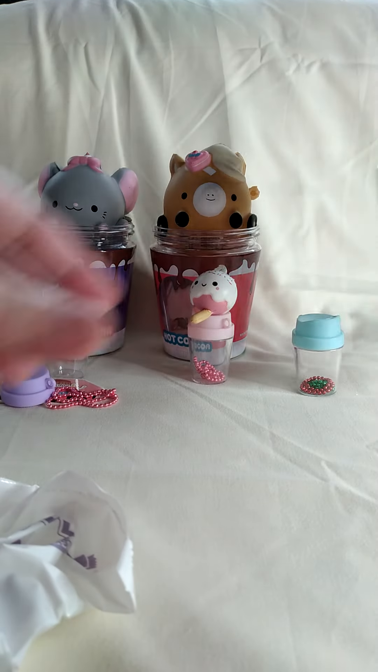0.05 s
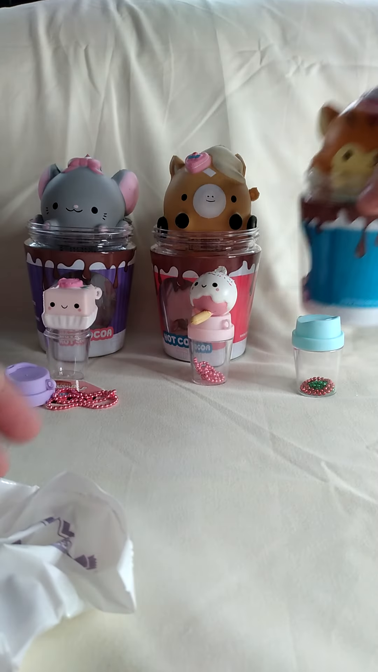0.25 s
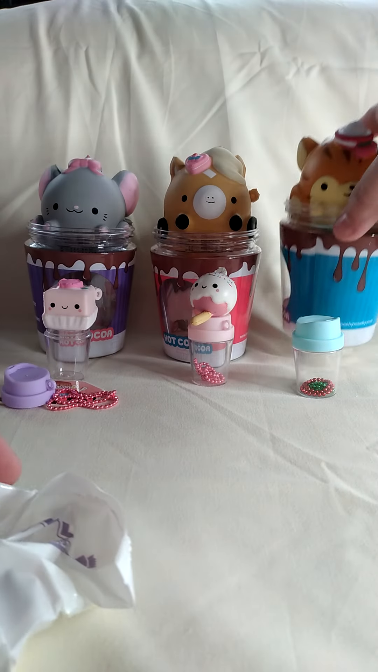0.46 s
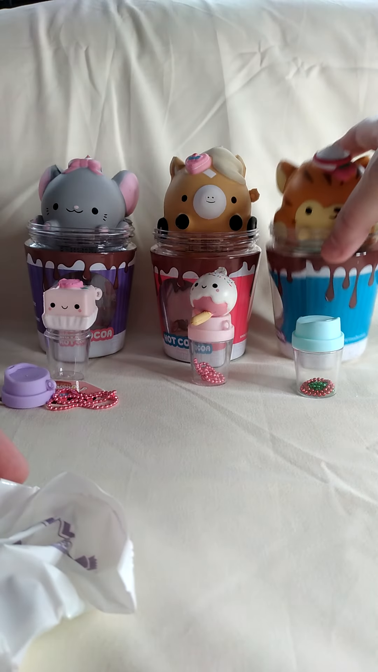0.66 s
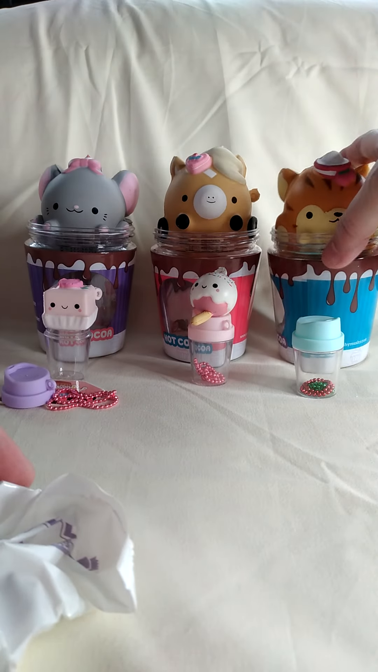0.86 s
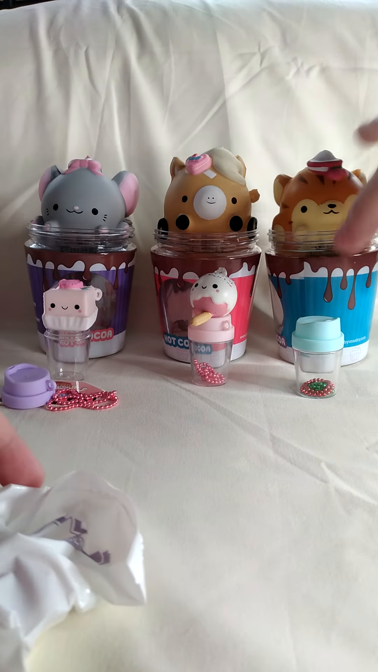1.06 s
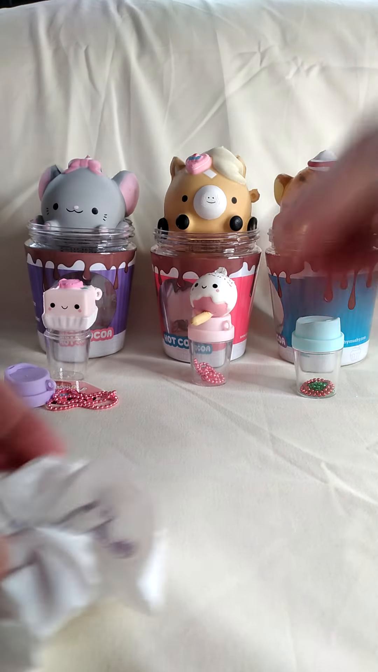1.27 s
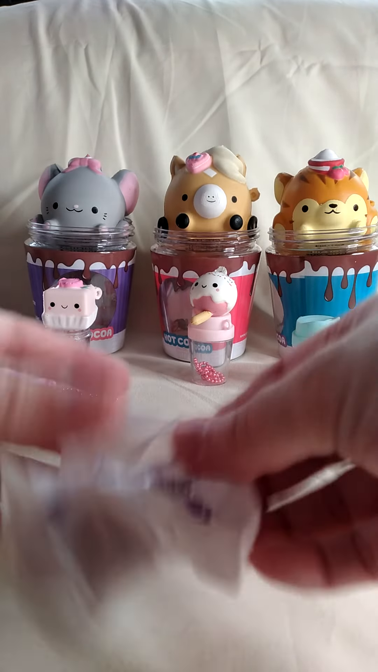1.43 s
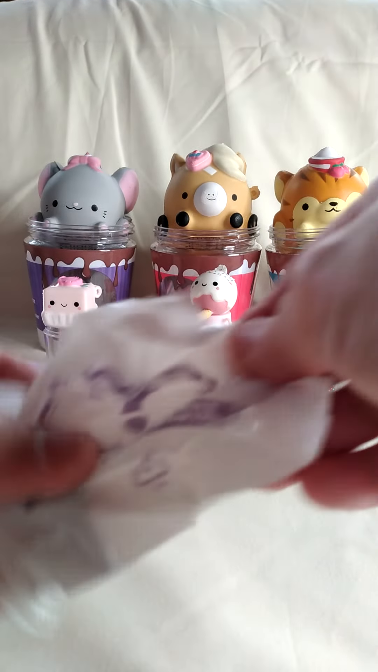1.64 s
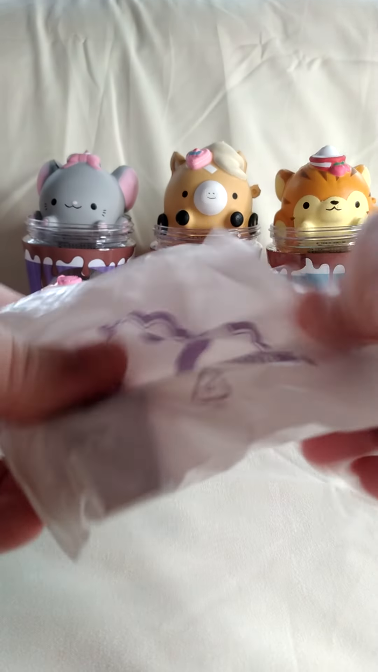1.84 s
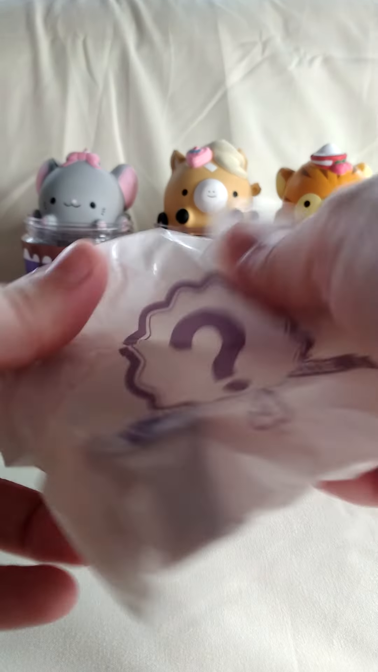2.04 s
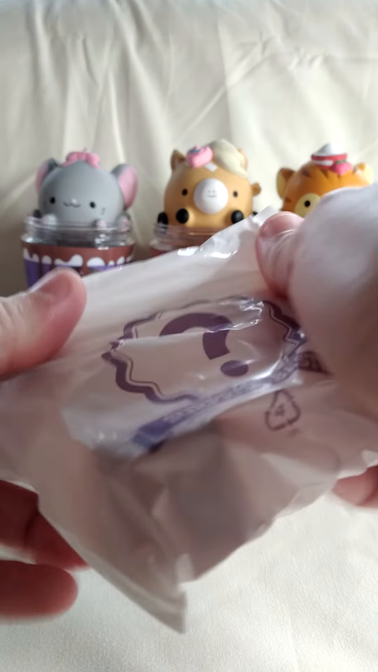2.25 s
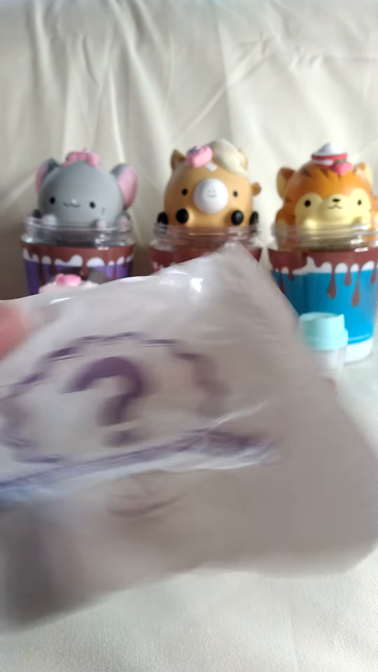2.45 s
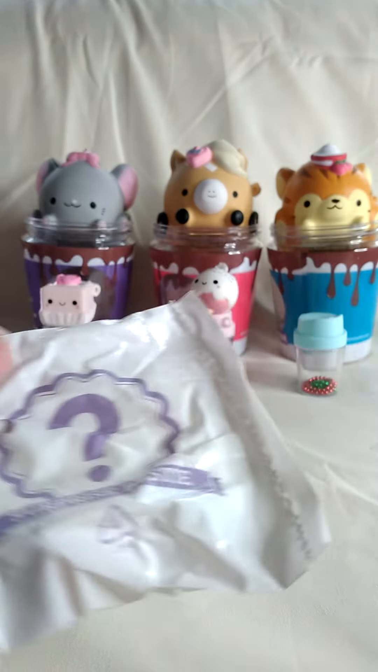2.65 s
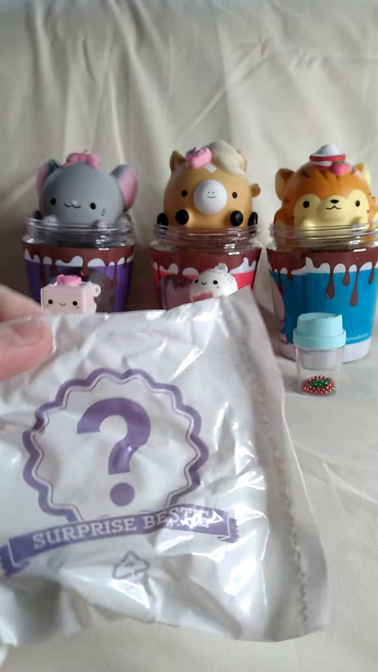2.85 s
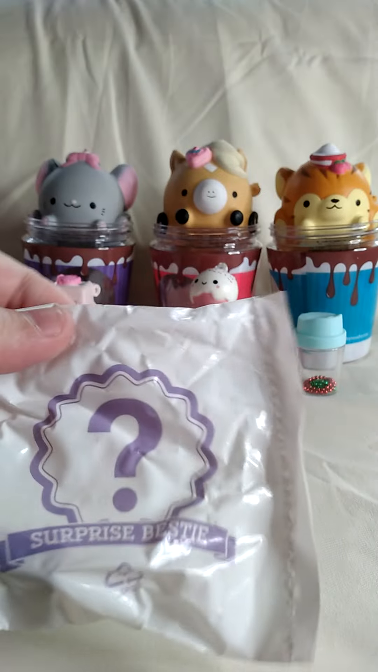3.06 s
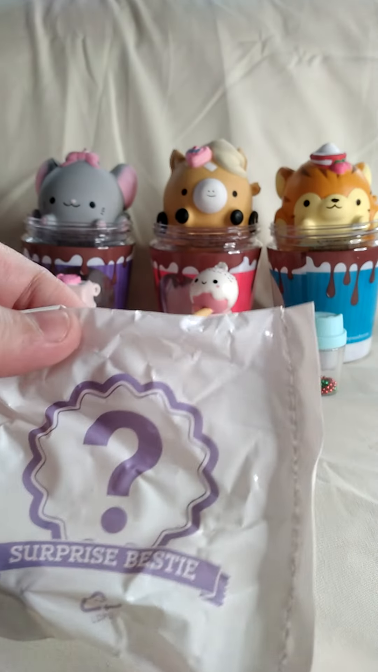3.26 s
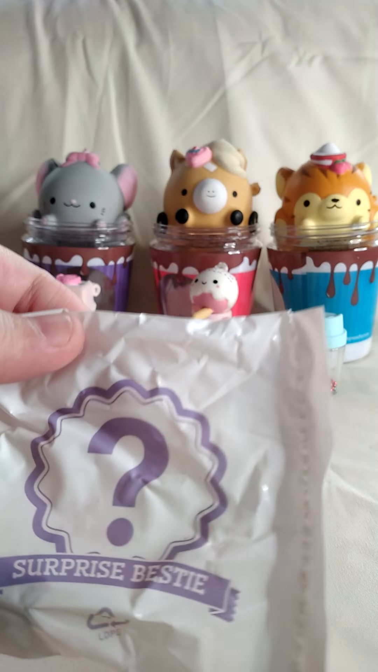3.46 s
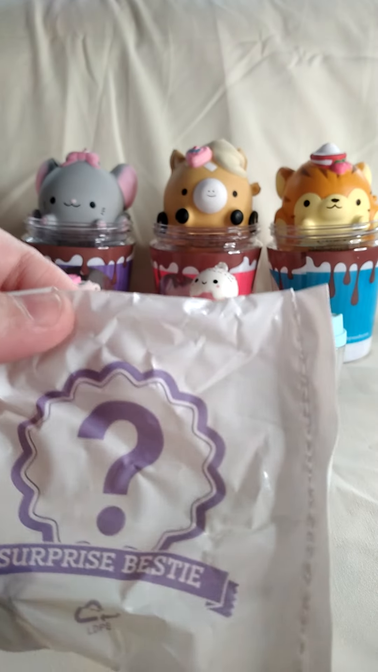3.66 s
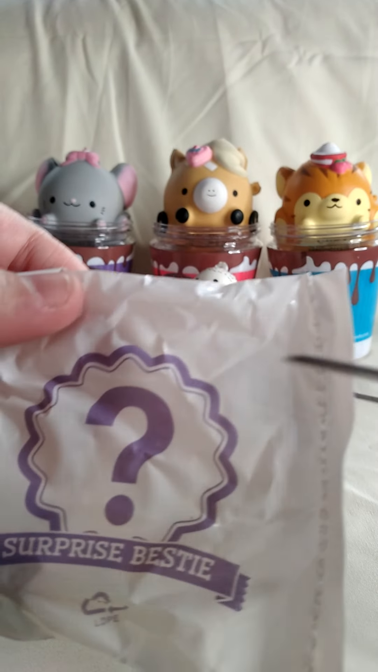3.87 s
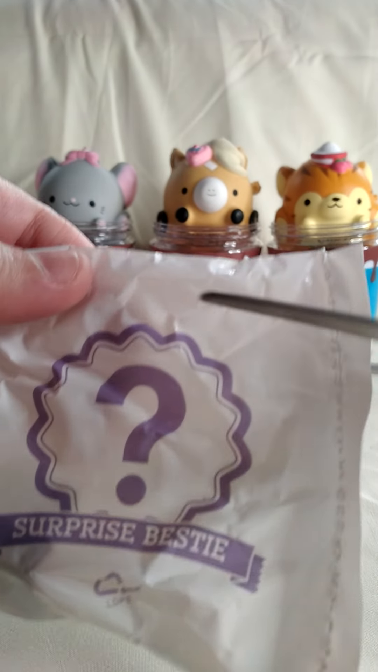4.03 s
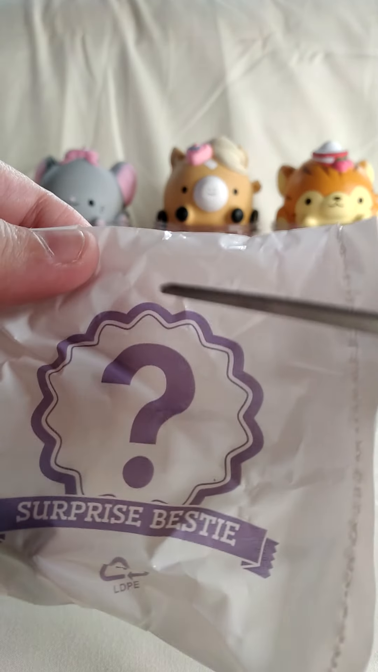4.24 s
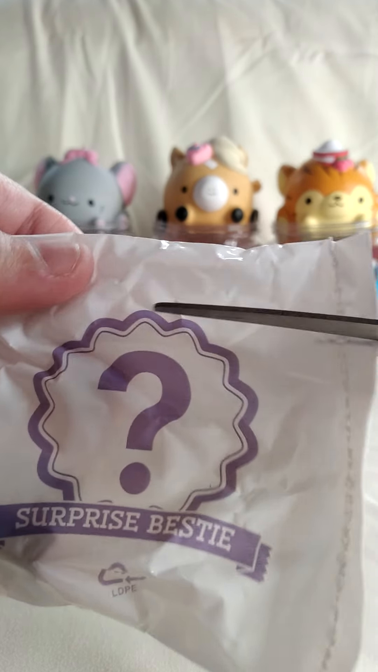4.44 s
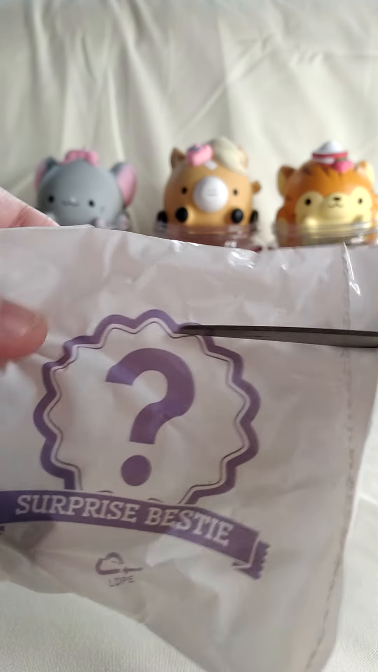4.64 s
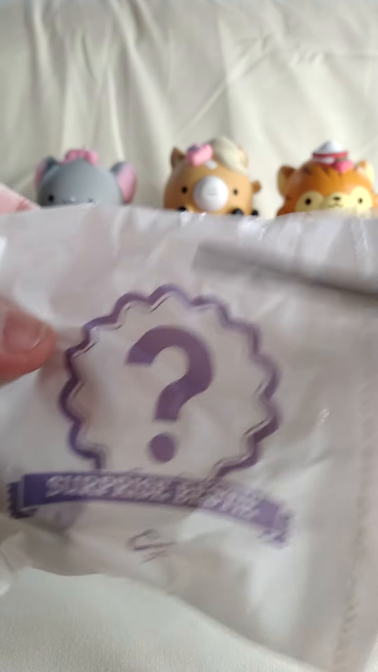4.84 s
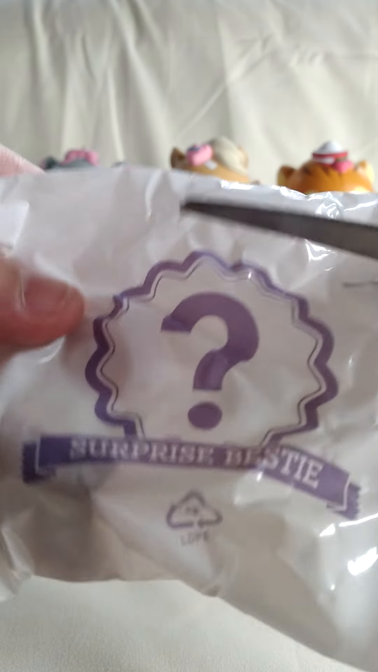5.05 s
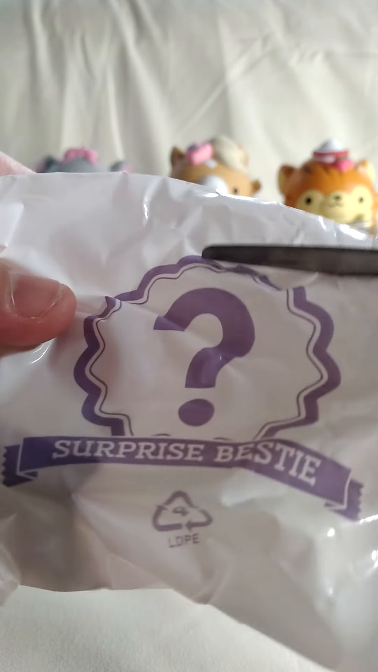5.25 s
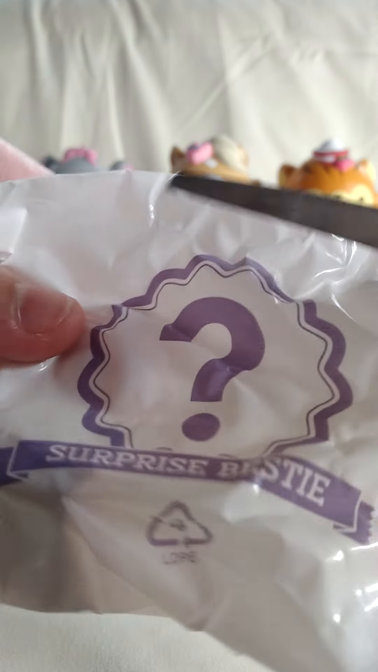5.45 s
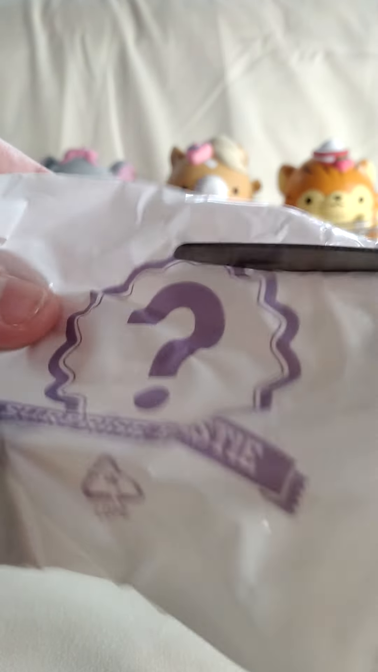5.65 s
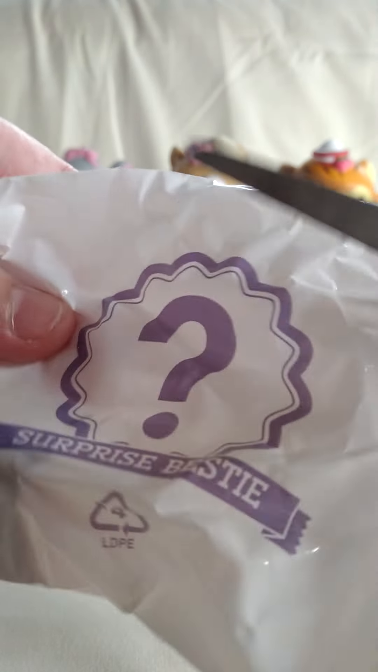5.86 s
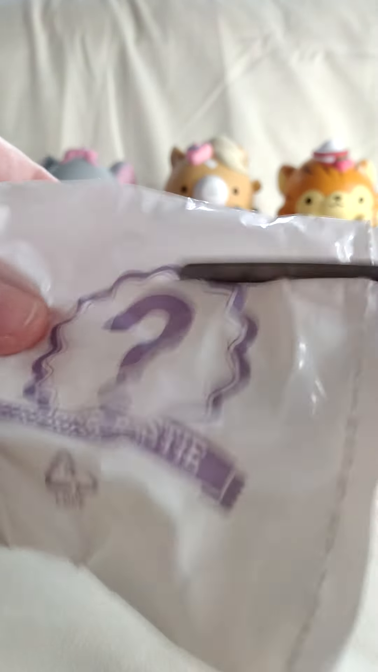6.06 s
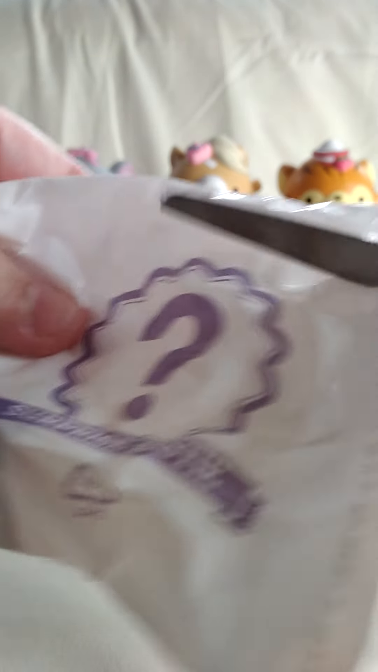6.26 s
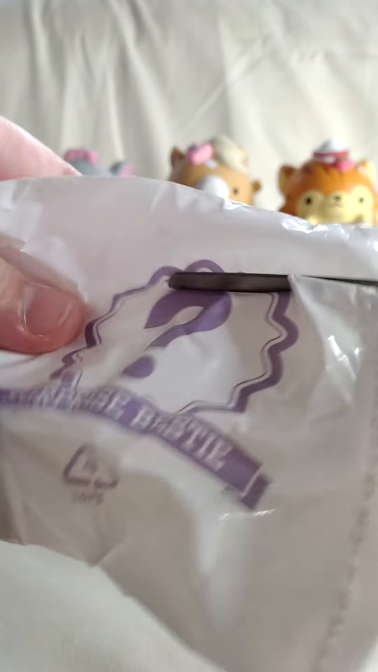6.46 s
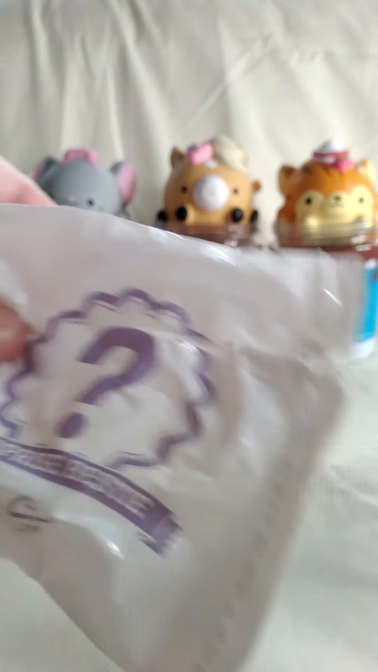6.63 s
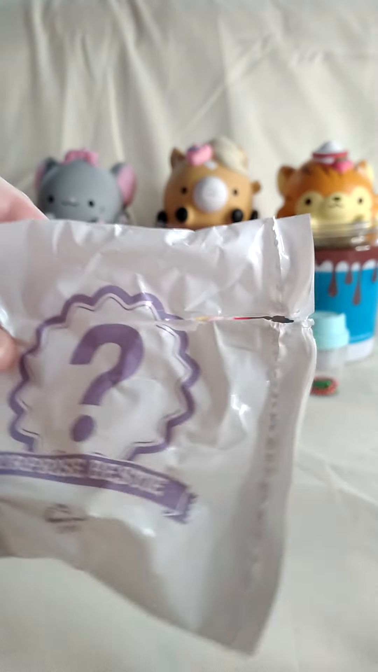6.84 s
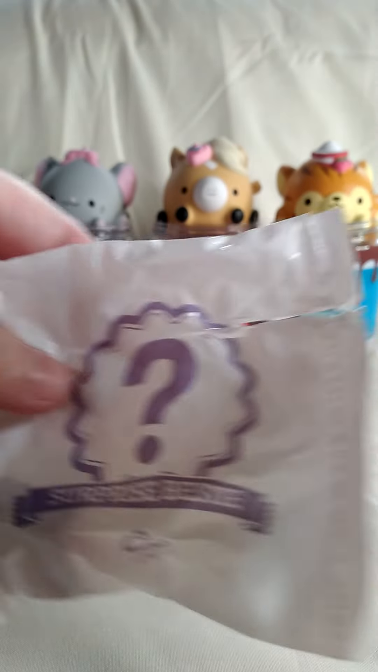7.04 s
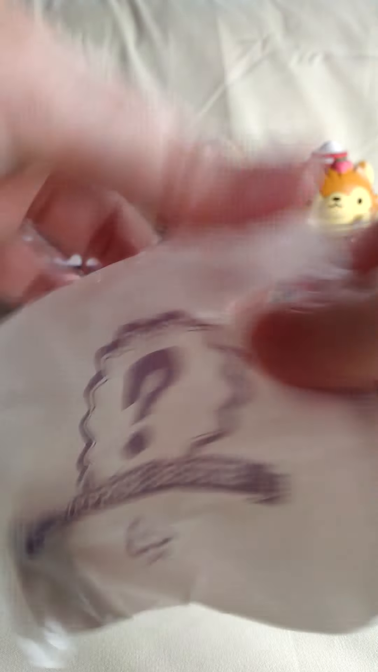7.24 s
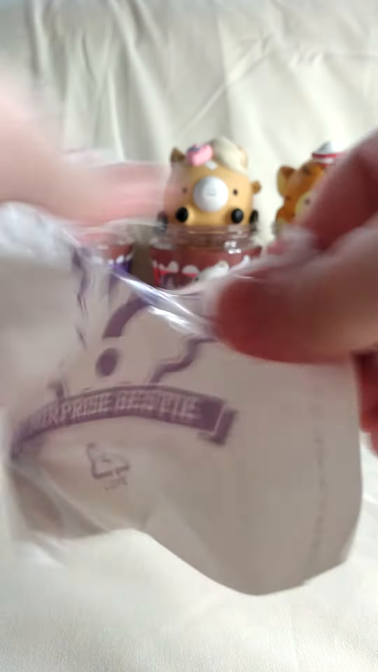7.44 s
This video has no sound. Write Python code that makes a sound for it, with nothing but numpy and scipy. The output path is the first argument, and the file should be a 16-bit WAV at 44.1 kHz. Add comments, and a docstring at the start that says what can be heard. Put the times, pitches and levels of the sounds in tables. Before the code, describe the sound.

Thin plastic pouch crumpled close up in bright crackling bursts, then snipped with scissors, over faint fan hiss and low wind-like buffeting on the microphone.

```python
"""In a quiet room, a thin plastic pouch is picked up, crumpled and cut open with scissors close to a phone.
Creases in the film snap over, singly and in dense rustles: each sets off short, fast-fading noise bursts.
A fan hisses far off, as shaped noise with thin tones, and its draught buffets the two microphone ports
as low, swelling noise with sudden pops. A few faint tones come and go; each port has its own treble resonance."""
import sys
import numpy as np
from scipy import signal
from scipy.fft import rfft, irfft
from scipy.io import wavfile
from scipy.ndimage import uniform_filter1d

SR = 44100
rng = np.random.default_rng(int(sys.argv[2]) if len(sys.argv) > 2 else 0)


def materialize(psi):
    """Save the field psi as 16-bit PCM at rate SR to the path in sys.argv[1].

    A 1-D psi becomes a single channel; in a 2-D psi each row is a channel.
    """
    bounded = np.clip(np.atleast_2d(psi).T, -1, 1)
    quanta = np.round(bounded * 32767).astype(np.int16)
    wavfile.write(sys.argv[1], SR, quanta)


def volts_from_db(level):
    """Convert decibel levels to linear amplitude ratios."""
    exponent = np.asarray(level, float) / 20
    return 10 ** exponent


N = 330750


def rms_one(x):
    """Scale to an rms (average strength) of 1."""
    return x / np.sqrt(np.mean(x ** 2) + 1e-20)


def in_time(rows):
    """Turn a table of (time, values) into curves with one value a sample."""
    s, *columns = np.transpose(rows)
    return [np.interp(np.arange(N) / SR, s, c) for c in columns]


def band(x, low_hz, high_hz):
    """Keep the pitches between two edges (Butterworth band-pass)."""
    return signal.sosfilt(signal.butter(2, [low_hz, high_hz], "band", fs=SR, output="sos"), x)


def drift(rate_hz):
    """Slow random wandering with rms 1: noise smoothed twice, made at every 40th sample."""
    r = np.exp(-80 * np.pi * rate_hz / SR)
    noise = rng.standard_normal(N // 40 + 2002)
    slow = signal.lfilter([1], [1, -2 * r, r * r], noise)[2000:]   # drop the filter's start
    return np.interp(np.arange(N) / 40, np.arange(len(slow)), rms_one(slow))


def coloured_noise(spectrum):
    """Two unrelated noises with the given spectrum, scaled together to rms 1."""
    hz, db = np.transpose(spectrum)
    grid_hz = np.fft.rfftfreq(N, 1 / SR) + 1   # + 1 avoids the logarithm of 0
    shape = volts_from_db(np.interp(np.log(grid_hz), np.log(hz), db))
    return rms_one(irfft(rfft(rng.standard_normal((2, N))) * shape, N))


def swells(starts, holds, levels_db, rise_db_per_s, fall_db_per_s, rest_db):
    """Level in dB of swells that rise, hold and fall over a resting level; their powers add."""
    t = np.arange(0, N, 64)[:, None] / SR   # every 64th sample is enough
    before, after = np.maximum(starts - t, 0), np.maximum(t - starts - holds, 0)
    db = levels_db - rise_db_per_s * before - fall_db_per_s * after
    total_db = 10 * np.log10(np.sum(volts_from_db(db) ** 2, axis=1) + volts_from_db(rest_db) ** 2)
    return np.interp(np.arange(N) / SR, t[:, 0], total_db)


def dying(clicks, t60):
    """Every click starts an exponential decay that loses 60 dB in t60 seconds."""
    return signal.lfilter([1], [1, -volts_from_db(-60 / (t60 * SR))], clicks)


# spectrum of the fan's hiss: (frequency [Hz], relative level per Hz [dB])
FAN_SPECTRUM = [(100, 1.5), (400, -4), (800, -6.5), (1700, -3), (2600, -6), (3600, -15.5), (5500, -25),
                (9000, -26), (16000, -29)]
# thin tones in the fan's hiss: (frequency [Hz], usual rms level [dB])
FAN_LINES = [(926, -83), (1195, -85.5), (1590, -79), (1725, -78)]


def fan():
    """Broad hiss, stronger on the left, with thin lines whose level and phase waver slightly."""
    t = np.arange(N) / SR
    lines = np.zeros(N)
    for hz, db in FAN_LINES:
        strength = np.sqrt(2) * volts_from_db(db + 1.0 * drift(5.6))
        lines += strength * np.sin(2 * np.pi * hz * t + 1.5 * drift(4.8))
    hiss_db = -59.5 + np.array([[1.5], [-1.5]])
    return volts_from_db(hiss_db) * coloured_noise(FAN_SPECTRUM) + lines


# basic spectrum of the draught's buffeting: (frequency [Hz], relative level per Hz [dB])
BUFFET_SPECTRUM = [(20, 4), (60, 4.5), (130, -5.5), (250, -20), (500, -45.5), (1000, -51.5), (3000, -110)]
# gusts: (time at full strength [s], hold [s], left port level [dB], right port level [dB])
GUSTS = [(0.0, 0.0017, -44, -27.5), (0.11, 0.0083, -41, -38.5), (0.328, 0.032, -63, -37),
         (0.552, .005, -70, -33), (0.673, .02, -58, -37.5), (0.773, 0.045, -53, -32),
         (0.885, .03, -52, -38.5), (0.964, 0.02, -51, -29), (1.26, 0.066, -57, -40),
         (1.59, 0.028, -54, -38.5), (2.133, 0.013, -54, -36), (2.297, .005, -52, -27.5),
         (2.396, 0.085, -59, -35), (2.704, 0.086, -57, -29), (2.96, 0.088, -66, -39.5),
         (3.232, 0.044, -41.5, -51), (3.492, 0.038, -60, -27.5), (3.388, 0.042, -57.5, -37),
         (3.609, 0.22, -56, -39.5), (4.001, 0.004, -35, -28), (4.065, 0.0045, -43.5, -21.5),
         (4.234, 0.018, -53, -37.5), (4.313, 0.057, -45, -36), (4.386, .005, -33, -36),
         (4.52, 0.0085, -55, -40), (4.803, 0.022, -55, -36.5), (4.879, .05, -58, -29),
         (5.186, 0.015, -51, -35), (5.506, 0.058, -61, -37.5), (5.6, 0.015, -36, -48),
         (5.682, .005, -46, -30), (6.07, 0.13, -43, -35.5), (6.365, 0.38, -42, -42),
         (6.724, 0.022, -54, -24), (6.8, 0.052, -47, -56), (6.931, 0.023, -40, -24.5),
         (7.193, 0.0069, -44, -32), (7.46, 0.049, -41, -29.5)]
# level between gusts: (left port [dB], right port [dB])
LULL_DB = [-49.5, -45]


def draught(brighten=0.42, lumpy_db=3.5, even_s=0.051):
    """Turbulence at each port on its own; a stronger gust reaches higher in pitch."""
    s, hold, *ports_db = np.transpose(GUSTS)
    rise_db_per_s, fall_db_per_s = 260, 200
    level_db = np.array([swells(s, hold, db, rise_db_per_s, fall_db_per_s, lull_db) + lumpy_db * drift(20)
                         for db, lull_db in zip(ports_db, LULL_DB)])
    noise = coloured_noise(BUFFET_SPECTRUM)
    # even out the noise's own ups and downs, so that the gust sets the strength
    noise = noise / np.sqrt(uniform_filter1d(noise ** 2, int(even_s * SR)) + 0.073)
    upper = band(noise, 93, 2900)
    upper_share = volts_from_db(brighten * (level_db + 31.5)) - .5
    return volts_from_db(level_db) * (noise + upper_share * upper)


# sudden gust fronts at the right port: (time [s], level [dB])
POPS = [(0.534, -27.5), (2.691, -28), (3.511, -34), (4.055, -20.5), (6.723, -15), (6.914, -31)]


def pops(width_s=0.0014):
    """A gust front pushes the right membrane through one quick swing."""
    swings = np.zeros(N)
    for s, db in POPS:
        x = (np.arange(N) / SR - s) / width_s
        swings += volts_from_db(db) * x * np.exp(-x ** 2)
    return np.array([np.zeros(N), 2 * swings])


# faint short tones, some mere taps:
# (time of middle [s], frequency [Hz], time from middle to 1/e [s], level before the left-right tilt [dB])
FAR_TONES = [(0.78, 442, 0.089, -66.5), (1.193, 557, 0.0053, -55), (2.627, 341, 0.056, -64.5),
             (2.675, 680, 0.0016, -44), (4.6, 446, 0.04, -66), (5.4, 455, 0.065, -68.5)]


def far_tones():
    """Soft sines that swell and fade, stronger on the left."""
    t = np.arange(N) / SR
    tones = np.zeros(N)
    for s, hz, length, db in FAR_TONES:
        tones += volts_from_db(db) * np.exp(-((t - s) / length) ** 2) * np.sin(2 * np.pi * hz * t)
    return tones * volts_from_db(np.array([[2.5], [-2.5]]))


# squeezes and cuts that set small creases rustling:
# (time at full strength [s], hold [s], rustle level before the zone levels [dB])
GRIPS = [(.98, 0.17, -64), (1.168, .005, -57.5), (1.258, 0.039, -56), (1.455, 0.28, -47),
         (1.69, 0.014, -25.5), (1.797, 0.039, -35.5), (1.877, 0.15, -41.5), (2.068, 0.12, -34.5),
         (2.24, 0.014, -34.5), (2.312, 0.046, -47.5), (2.408, 0.08, -44), (2.645, 0.16, -59),
         (2.843, 0.0083, -53), (2.954, .04, -60), (3.237, 0.036, -60.5), (3.465, 0.0027, -56),
         (3.586, 0.023, -51), (4.24, 0.19, -67.5), (4.533, 0.13, -57.5), (4.75, .003, -47.5),
         (4.872, 0.016, -51), (4.95, 0.29, -60), (5.206, 0.033, -41), (5.384, 0.037, -51),
         (5.51, 0.15, -48), (5.707, 0.0063, -36), (5.827, 0.018, -42), (5.982, 0.053, -57),
         (6.089, 0.035, -32.5), (6.235, 0.059, -41.5), (6.441, 0.007, -32.5), (6.482, 0.0072, -35.5),
         (6.583, 0.015, -35.5), (6.81, 0.028, -58), (6.894, 0.14, -63.5), (7.135, 0.021, -63),
         (7.204, 0.0038, -41), (7.265, 0.046, -53), (7.385, 0.0035, -44.5), (7.457, .045, -37.5)]


def squeeze():
    """How hard the film is worked, as rustle level in dB."""
    return swells(*np.transpose(GRIPS), rise_db_per_s=460, fall_db_per_s=402, rest_db=-71.5)


# how strongly a rustle strikes each film zone: (top [dB], middle [dB], body [dB])
RUSTLE_ZONES_DB = [-13.5, -17.5, -23.5]


def rustle(per_s=1100, spread_db=4.5, denser=.6):
    """Many small creases in clumps, few of them large; a light touch gives finer, denser, smoother rustle."""
    level_db = squeeze()
    finer_db = np.clip(-denser * (level_db + 41.5), -4, 16)
    born = rng.random(N) < per_s * volts_from_db(finer_db + 2.5 * drift(25)) / SR
    # the more creases there are, the smaller each one is
    size_db = spread_db * np.minimum(rng.exponential(1, N), 4.0) - 0.83 * finer_db
    return volts_from_db(level_db + np.reshape(RUSTLE_ZONES_DB, (3, 1))) * born * volts_from_db(size_db)


# loud crease snaps: (time [s], strike level in the top zone [dB], middle zone relative to top [dB])
SNAPS = [(1.133, -47, -4), (1.16, -40, -5), (1.3379, -51.5, 7), (1.468, -35.5, 1.5), (1.4854, -23.5, -4),
         (1.5172, -32, 9.5), (1.5305, -27, -1.5), (1.5779, -46, 7.5), (1.613, -16, -17), (1.6362, -35.5, 5),
         (1.6553, -31, 0), (1.662, -32, 0), (1.672, -23, -15), (1.689, -27, 6.5), (1.6941, -26, 3),
         (1.7062, -9, -7.5), (1.733, -10.5, -13), (1.7461, -19, -4.5), (1.7706, -20, -5),
         (1.7869, -6.5, -8), (1.7916, -14.5, -4), (1.7994, -17, -16), (1.8228, -27, -13),
         (1.8363, -16.5, -9), (1.851, -13.5, -10.5), (1.8844, -6, -16.5), (1.901, -33, 6.5),
         (1.9174, -34, -7), (1.9366, -25, -5), (1.9618, -24, -32), (1.9717, -17.5, -15),
         (1.981, -17.5, -12), (1.99, -30, -11), (2.0404, -21, -6), (2.0513, -19.5, 3.5),
         (2.084, -25.5, 3.5), (2.0924, -12.5, -6), (2.1206, -18, -25), (2.128, -21, -3.5), (2.14, -21, -11),
         (2.155, -10.5, -15), (2.1693, -12, -10), (2.177, -6.5, -28), (2.1821, -24, -6), (2.234, -26.5, -7),
         (2.248, -26, -4), (2.252, -32, -4), (2.28, -40, -14), (2.2874, -34, -14), (2.3074, -19, -10.5),
         (2.3975, -38, -12), (2.415, -29, -25), (2.43, -31, 0), (2.4486, -34, -19), (2.4718, -10, -16),
         (2.495, -12, -14.5), (2.509, -37, -6), (2.671, -49, -3), (2.705, -50, -9), (2.841, -33.5, -9),
         (2.896, -52, -6), (3.0, -51, -2.5), (3.252, -41, -28), (3.2644, -41, -3.5), (3.581, -43, -2.5),
         (3.5917, -21, -6.5), (3.602, -52, -22), (4.6756, -26.5, -9), (4.701, -45.5, 1), (4.7372, -41, -8),
         (4.746, -38, 0), (4.7662, -49, 5), (4.8806, -40, -30), (4.95, -50, -6), (5.03, -44.5, -8),
         (5.1086, -12, -14), (5.1254, -19, -1.5), (5.1762, -51, 14), (5.213, -44, -2), (5.217, -29, -12),
         (5.262, -51, -16), (5.3006, -42, -13), (5.372, -40, 0), (5.3882, -18.5, -11), (5.4002, -32, -33),
         (5.5082, -20.5, -2.5), (5.6061, -42, 4), (5.679, -21.5, -19), (5.688, -13, -26),
         (5.7052, -41, -11), (5.7254, -36.5, 1.5), (5.8164, -17, -27), (5.8245, -22.5, -9),
         (5.884, -33.5, -14), (5.9744, -34.5, -15), (6.0542, -38, -35), (6.0765, -24.5, -19),
         (6.1106, -17, -11), (6.117, -10, -9), (6.1188, -20, -25), (6.127, -21, 7.5), (6.137, -20, -7),
         (6.15, -33, 7), (6.199, -46, 4), (6.2333, -30, -6), (6.2419, -14.5, -8.5), (6.25, -18, -5),
         (6.278, -28, -19), (6.2908, -33, -6), (6.3171, -31.5, -11), (6.332, -44, 2), (6.347, -44, 1),
         (6.4267, -31, -7), (6.4359, -16, -8), (6.4565, -18, -23), (6.4895, -25, -0.5), (6.5052, -18, -6.5),
         (6.516, -27, -23), (6.566, -35, -20), (6.574, -29, 4), (6.597, -23, -0.5), (6.6082, -20, -7),
         (6.7906, -26.5, -15), (6.9091, -29.5, -11.5), (6.916, -43, -19), (7.1971, -27.5, -8),
         (7.2092, -26, -8), (7.244, -34, -22), (7.3038, -38.5, 2), (7.311, -23.5, -14), (7.334, -42, -9),
         (7.3638, -32, -17), (7.3846, -17, -14), (7.3973, -38, 0), (7.4247, -40, 5.5), (7.4477, -11.5, -25),
         (7.4582, -18, -2.5), (7.4691, -14, -10), (7.4802, -15, -30), (7.4945, -11, -7)]


def snaps():
    """Strikes of the loud creases, one row per zone; thin film moves little air, so the body is held back."""
    s, top_db, middle_db = np.transpose(SNAPS)
    at, middle_db = np.round(s * SR).astype(int), top_db + middle_db
    # the body follows the middle and the squeeze only in part
    body_db = -40 + .3 * (middle_db + 36.5) + 0.23 * (squeeze()[at] + 45)
    body_db = body_db + 2 * rng.standard_normal(len(s))
    strikes = np.zeros((3, N))
    strikes[:, at] = volts_from_db([top_db, middle_db, body_db])
    return strikes


# film zones that ring after a strike (top, middle, body): (low edge [Hz], high edge [Hz],
# first 60 dB decay [s], share of noise power heard alike by both ports [0-1], level [dB])
ZONES = [(8040, 15070, 0.0025, 0.14, -5.5), (4430, 11240, 0.0046, 0.14, -2.5),
         (218, 3760, 0.0072, 0.73, -2)]


def film(strikes, colour_db=0.5, tail_db=-14, tail_times=3.7):
    """Each strike sets the film rattling: noise bursts dying fast, then slower; the ports hear them partly alike."""
    out = np.zeros((2, N))
    rise = np.exp(-1 / (.00012 * SR))   # the crease takes 0.12 ms to fold over
    for clicks, (low_hz, high_hz, t60, alike, db) in zip(strikes, ZONES):
        edges = np.geomspace(low_hz, high_hz, num=4)
        width = np.sqrt(SR / 2 / (high_hz - low_hz))   # keeps the burst's height through the filter
        for low, high in zip(edges, edges[1:]):
            # each snap has a colour of its own, which wanders as the grip shifts
            wander_db = colour_db * rng.standard_normal(N) + 2.58 * drift(40)
            blows = clicks * volts_from_db(wander_db) + 1e-18
            envelope = dying(blows, t60) + volts_from_db(tail_db) * dying(blows, tail_times * t60)
            envelope = signal.lfilter([1 - rise], [1, -rise], envelope)
            shared, *own = rng.choice([-1., 1.], (3, N))
            noise = np.sqrt(alike) * shared + np.sqrt(1 - alike) * np.array(own)
            out += volts_from_db(db) * width * band(envelope * noise, low, high)
    return out


# where the pouch is held: (time [s], level at the left port before shading, relative to right [dB])
POUCH_SIDE = [(2.5, -3.5), (3.5, 0), (4.8, -7), (5.1, -5.5), (6.6, -6.5), (7.1, 4.5)]


def pouch():
    """Snaps and rustle at both ports: the left hears them later and with its top shaded."""
    sound = film(snaps() + rustle())
    lag_s, shade_db, shade_hz = 0.00026, -2.5, 8200
    left = np.interp(np.arange(N) - lag_s * SR, np.arange(N), sound[0])
    left = volts_from_db(shade_db) * left + (1 - volts_from_db(shade_db)) * band(left, 100, shade_hz)
    sound[0] = volts_from_db(in_time(POUCH_SIDE)[0]) * left
    return sound


def room(x, t60_s=.12, level_db=-24):
    """Echoes off the room as a short fading noise tail, a separate one for each side."""
    t = np.arange(int(t60_s * SR)) / SR
    tail = rng.standard_normal((2, len(t))) * volts_from_db(-60 * t / t60_s) * (t > .004)   # silent for the first 4 ms
    tail /= np.sqrt(np.sum(tail ** 2, axis=1, keepdims=True))
    return volts_from_db(level_db) * signal.fftconvolve(x, tail, axes=1)[:, :N]


def scene():
    """Add the pouch and its echoes to the fan, the draught, the pops and the faint tones."""
    near = pouch()
    return near + room(near) + fan() + far_tones() + draught() + pops()


def roll_off(x):
    """The treble ends steeply here."""
    return signal.sosfilt(signal.butter(12, 16830, fs=SR, output="sos"), x)


# treble resonance of each port, left then right: (frequency [Hz], width [Hz], boost [dB])
PORTS = [(6950, 1150, 9.5), (11000, 1500, 11.5)]


def record(dry):
    """Each port lifts the treble at its own resonance; the top is cut and loud peaks are softly rounded."""
    out = dry.copy()
    for k, (hz, width_hz, db) in enumerate(PORTS):
        r = np.exp(-np.pi * width_hz / SR)
        turn = 2 * np.pi * hz / SR
        resonator = [1, -2 * r * np.cos(turn), r * r]
        peak = signal.lfilter([(1 - r * r) / 2, 0, (r * r - 1) / 2], resonator, dry[k])
        out[k] += (volts_from_db(db) - 1) * peak
    # 50 dB down from 16940 Hz upward
    out = signal.sosfilt(signal.cheby2(10, 50, 16940, fs=SR, output="sos"), out)
    mix = np.tanh(out)
    return roll_off(mix)


dry = scene()
out = record(dry)
materialize(out)
```